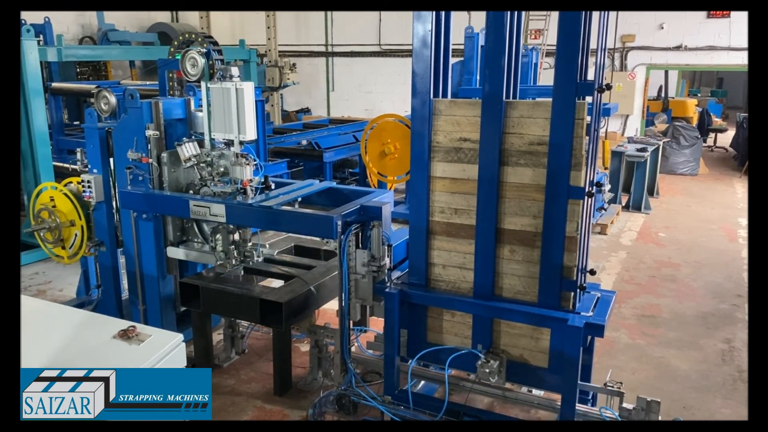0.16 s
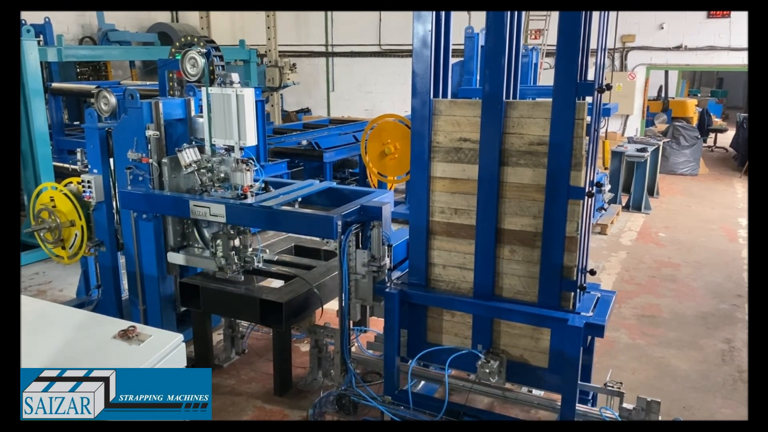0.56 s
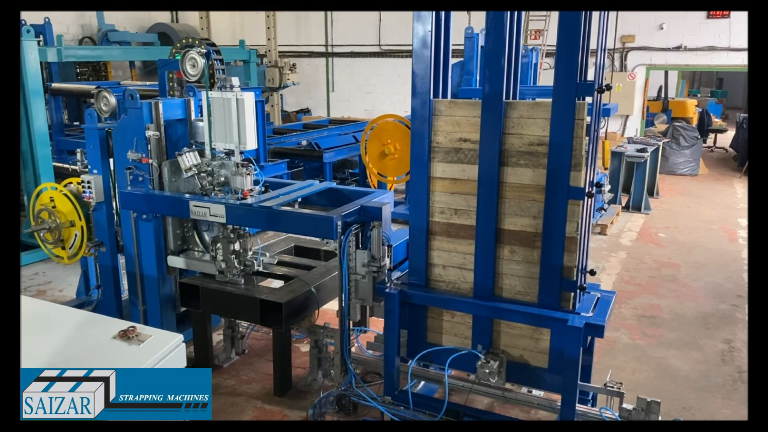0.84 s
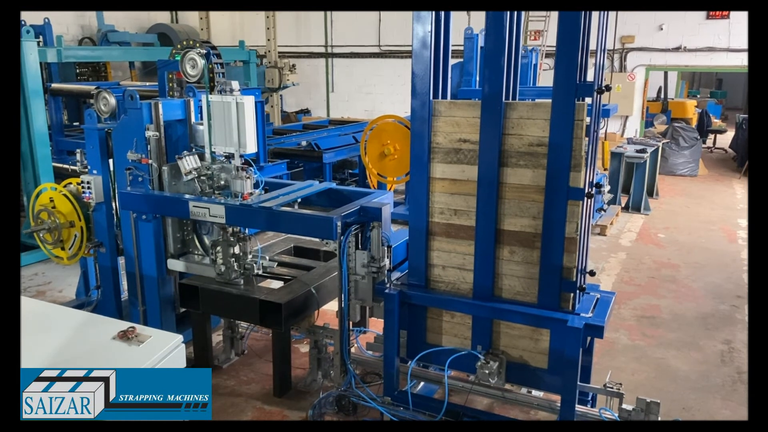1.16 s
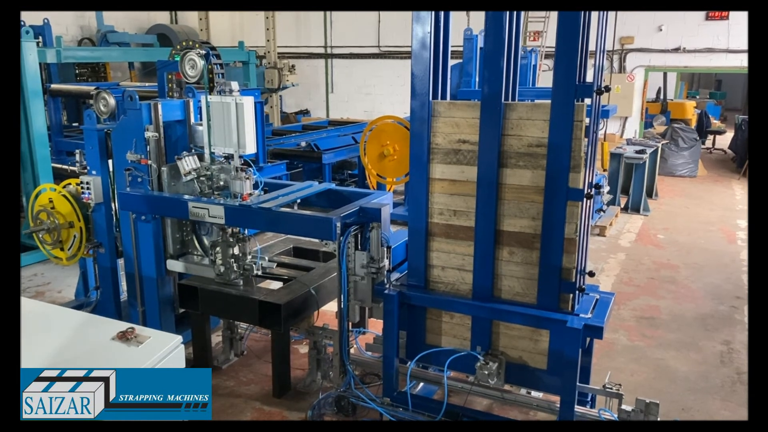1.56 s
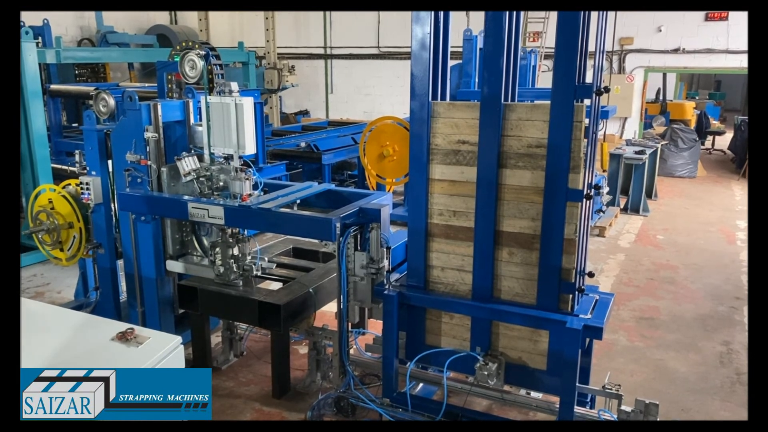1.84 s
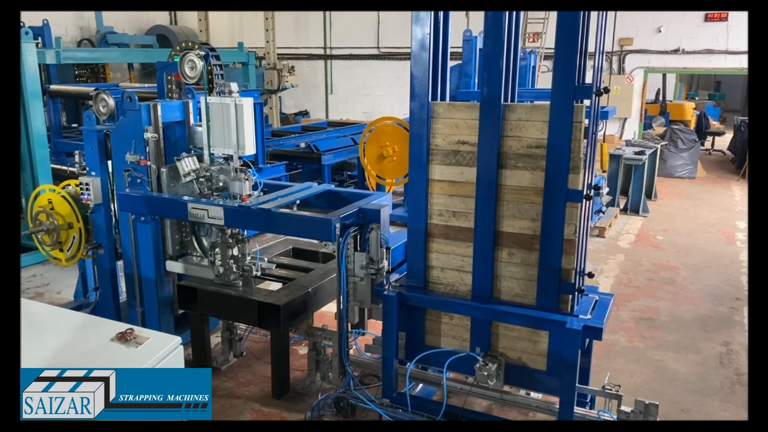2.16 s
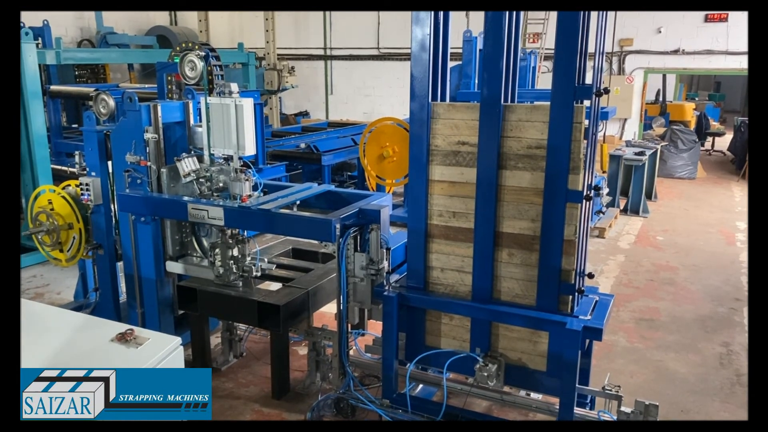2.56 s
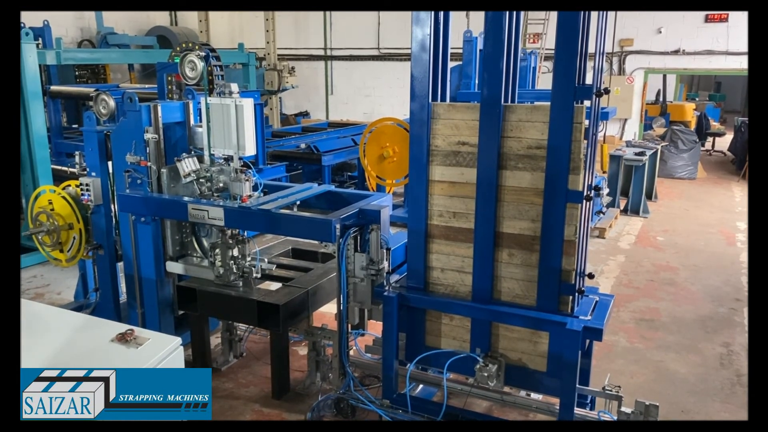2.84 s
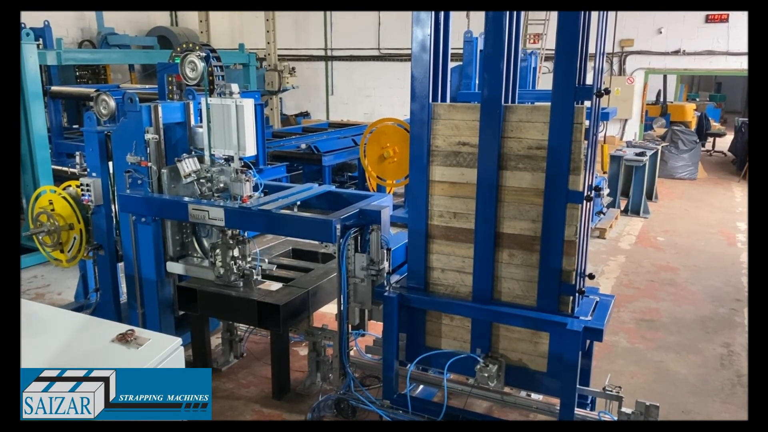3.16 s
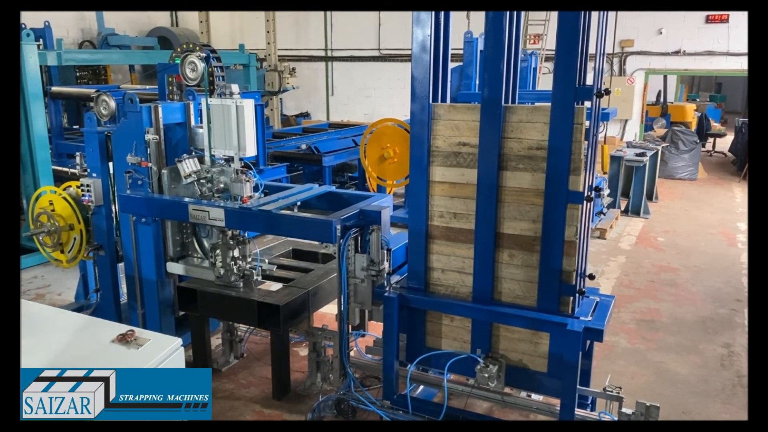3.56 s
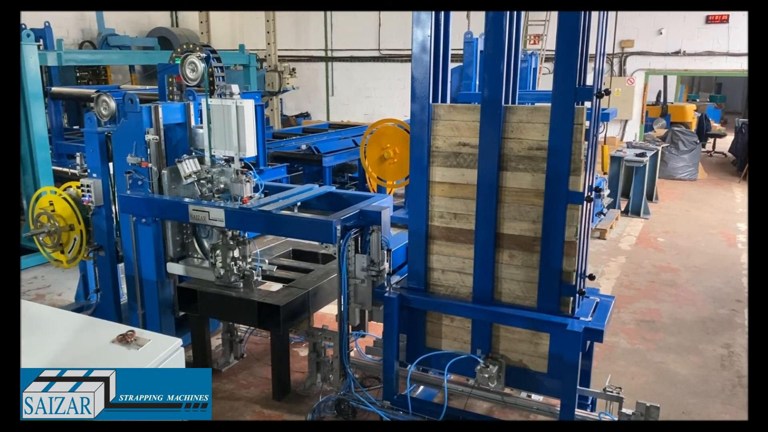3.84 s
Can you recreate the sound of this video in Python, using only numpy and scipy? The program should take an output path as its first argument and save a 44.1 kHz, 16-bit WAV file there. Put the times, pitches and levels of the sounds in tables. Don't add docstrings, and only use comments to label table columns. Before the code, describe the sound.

A strapping machine, slightly left and a few steps away in a hard-walled hall, hisses compressed air until 1.2 s, with clacks at 0.1 and 0.3. A low drive hums and rubs from 0.9 to 1.3; metallic knocks cluster at 1.1-1.6. Faint ventilation remains until clacks at 2.7, the strongest ringing, and 2.95. From 3.3 a harsh 250 Hz friction-weld buzz runs up, growing purer and louder around 3.7-3.8, then rougher to the end.

```python
import sys
import numpy as np
from scipy import signal
from scipy.fft import rfft, irfft, next_fast_len
from scipy.io import wavfile
from scipy.ndimage import uniform_filter1d, map_coordinates

SR = 44100
rng = np.random.default_rng(int(sys.argv[2]) if len(sys.argv) > 2 else 0)


def linear_from_db(decibels):
    return 10 ** (np.asarray(decibels, float) / 20)


def unload_audio(sound):
    columns = np.transpose(np.atleast_2d(sound))
    steps = np.round(np.clip(columns, -1, 1) * 32767)
    wavfile.write(sys.argv[1], SR, steps.astype(np.int16))


N = 176400
T = np.arange(N) / SR


def unit(x):
    return x / np.sqrt(np.mean(x ** 2) + 1e-20)


def along(points, hz):
    point_hz, value = np.transpose(points)
    return np.interp(np.log(hz + 1), np.log(point_hz + 1), value)


def curves(rows):
    seconds, *columns = np.transpose(rows)
    return [np.interp(T, seconds, column) for column in columns]


def fall_db(start_s, t60_s):
    return -60 * np.clip(T - start_s, 0, 9) / t60_s


def wobble(rate):
    return map_coordinates(rng.standard_normal(99 * 8), [T * rate])


def filtered(x, response):
    size = next_fast_len(x.shape[-1] + 8192)
    spectrum = rfft(x, size) * response(np.fft.rfftfreq(size, 1 / SR))
    return irfft(spectrum, size)[..., :x.shape[-1]]


def leading(pair):
    lead_s, top_hz = 4.5e-5, 5500

    def response(f):
        return np.exp(1j * np.pi * lead_s * np.outer([1, -1], f / (1 + (f / top_hz) ** 4)))
    return filtered(pair, response)


# frequency in Hz, correlation.
LIKENESS = [(100, .98), (400, 0.4), (1200, 0), (4000, .2), (7500, 0.45), (10500, .25), (13000, 0.8)]


def rush(spectrum):
    patchy_db = .8
    z = signal.stft(rng.standard_normal((2, N)), nperseg=512)[2]
    field = uniform_filter1d(rng.standard_normal(z.shape[1:]), size=6, axis=0)
    field = uniform_filter1d(field, size=10, axis=1)
    noise = signal.istft(z * linear_from_db(patchy_db * unit(field)), nperseg=512)[1][:, :N]

    def response(hz):
        turn = np.arccos(np.clip(along(LIKENESS, hz), -1, 1)) / 2
        return linear_from_db(along(spectrum, hz)) * [np.cos(turn), np.sin(turn)]
    mid, side = filtered(noise, response)
    return unit(leading(np.array([mid + side, mid - side])))


# frequency in Hz, level in dB.
WALLS = [(300, -1), (5000, -0.5), (9000, -4), (16000, -2.5)]
# frequency in Hz, 60 dB decay in seconds.
HALL_T60 = [(300, 0.76), (3000, 0.94), (9000, 1), (16000, 0.39)]


def placed(x, pan_db, wet_db):
    hz, t, z = signal.stft(rng.standard_normal((2, SR)), SR, nperseg=256)
    tail_db = along(WALLS, hz)[:, None] - 60 * t / along(HALL_T60, hz)[:, None]
    tail = signal.istft(z * linear_from_db(tail_db), SR, nperseg=256)[1]
    tail /= np.linalg.norm(tail[0])
    late = np.pad(x, (300, 0))[None]
    wet = signal.fftconvolve(late, tail, axes=1)[:, :len(x)]
    pan = linear_from_db(np.array([[pan_db], [-pan_db]]) / 2)
    return leading(np.array([x, x])) * pan + linear_from_db(wet_db) * wet


# time in seconds, flow in dB.
AIR_FLOW = [
    (0, -28),
    (.05, -31),
    (1.16, -30),
]
# frequency in Hz, density in dB per Hz.
JET = [(250, -27), (500, -21), (1000, -9.5), (3900, -2), (6500, -3.5), (10500, -12.5), (14000, -9),
       (16000, -12.5)]


def valve():
    shut_s, t60_s = 1.185, 0.6
    flow_db, = curves(AIR_FLOW)
    gain = linear_from_db(flow_db + wobble(12.66) / 2 + fall_db(shut_s, t60_s))
    return gain * rush(JET) * linear_from_db([[.5], [-.5]])


# start in seconds, level in dB, rise in seconds,
# 60 dB decay of the rattle in seconds, noise over ring in dB.
HITS = [(0, -43, .003, 0.62, -6), (.131, -28, 0.0049, 0.24, 6.5), (.263, -25.5, 0.0064, 0.17, 2.5),
        (.855, -43, 0.012, 0.21, 5), (1.137, -23.5, 0.024, 0.28, 0.5), (1.201, -21, 0.0085, 0.31, -6),
        (1.222, -22.5, 0.0067, 0.14, -2.5), (1.243, -35, 0.006, 0.15, 4.5),
        (1.321, -21, 0.0036, 0.027, -11.5), (1.558, -37.5, 0.015, 0.12, 3),
        (1.576, -27.5, 0.0037, 0.19, -5), (2.195, -63, 0.0038, .06, 3), (2.283, -65, 0.0033, .03, 1),
        (2.416, -66, 0.011, 0.23, 7), (2.618, -59, .003, .04, 2), (2.665, -34, 0.0061, 0.34, -1),
        (2.716, -27, .008, 0.13, 2), (2.726, -15.5, 0.0087, 0.13, -7), (2.957, -29, 0.0017, 0.31, -1),
        (2.958, -43, 0.004, 0.23, 4.5)]
PANS_DB = [2, -0.5, 0.5, 2, 1.5, 2, 0.5, -8, 5, 1, 3, 8, 0, 7, 7, 4, 8, 3, 2, 12]
# resonance in Hz, width in Hz, level in dB.
EARLIER = [(380, 40, 0), (1110, 50, 0), (1620, 90, -2)]
GRIP_A = [(312, 9, -6), (4490, 60, -1), (9950, 50, 1), (12900, 60, -3), (14100, 90, -6)]
GRIP_B = [(1190, 110, 2), (4490, 60, -6), (10600, 50, 2), (14000, 60, -3), (14900, 60, -10)]
STOP = [(415, 84, 3.5), (764, 3.7, 6), (970, 20, -58), (1230, 23, -8)]
PAWL = [(7580, 150, 5), (12900, 120, -6), (14700, 200, -6)]
CAM_A = [(2480, 60, -12), (4490, 35, -1), (4930, 55, -2), (7070, 50, -3), (7190, 40, 2), (9720, 90, 1),
         (10570, 70, 0), (13900, 110, -5), (15150, 170, -4)]
CAM_B = [(760, 40, -9), (1300, 250, -2), (4490, 45, -2), (7170, 50, -1), (9760, 110, -4), (10570, 45, -4),
         (15280, 90, -6)]
LATCH = [(900, 470, 2.5), (4520, 40, -12), (8120, 136, 1), (14100, 140, -3)]
CAM_C = [(426, 14, -9), (750, 15.5, -1), (1340, 75, -6.5), (4495, 76, 4), (7190, 18, 0.5), (9570, 29, -4.5),
         (10500, 49, -16), (13900, 51, -7), (15120, 46, -5)]
PRESS = [(760, 160, -1), (1750, 80, 0), (2450, 70, -2), (3760, 30, -3), (4480, 25, -3), (5160, 45, -4),
         (6250, 60, -8)]
# frequency in Hz, level in dB.
CLACK = [(100, -45), (300, -4), (700, -8), (3000, -1), (8000, 1), (15000, -5)]
# frequency in Hz, level in dB.
THUD = [(150, -26), (300, -17), (400, -3), (620, -1), (950, -5), (1500, -20), (4000, -38)]
# frequency in Hz, level in dB.
PADDED = [(100, -21), (400, -1), (2000, -3), (6000, -3.5), (15000, -14)]


def clacks():
    damped_hz = 9200
    widen, wet_db = 1.5, -3
    out, t = np.zeros((2, N + 2 * SR)), np.arange(SR) / SR
    parts = [EARLIER, GRIP_A, GRIP_B, STOP, STOP, CAM_A, CAM_A, STOP, PAWL, LATCH, CAM_B,
             LATCH, LATCH, LATCH, PAWL, LATCH, LATCH, CAM_C, PRESS, STOP]
    for (start, db, rise, t60, noise_db), pan_db, part in zip(HITS, PANS_DB, parts):
        shape = np.minimum(t / rise, 1) ** 2 * linear_from_db(-60 * np.maximum(t - rise, 0) / t60)
        rattle = shape * rng.standard_normal((len(part) + 1, len(t)))
        hz, width, level = np.transpose(part)[:, :, None]

        def resonance(f):
            return 1j * f * width / (hz * hz - f * f + 1j * f * width * widen)
        rings = filtered(rattle[1:] * shape ** (hz / damped_hz), resonance)
        ring = np.sum(linear_from_db(level) * rings / np.linalg.norm(rings, axis=1)[:, None], 0)

        colour = CLACK
        if part is STOP or part is EARLIER:
            colour = THUD
        elif part is PRESS:
            colour = PADDED
        crack = filtered(rattle[0], lambda f: linear_from_db(along(colour, f)))
        both = ring / np.linalg.norm(ring) + linear_from_db(noise_db) * crack / np.linalg.norm(crack)
        hit = linear_from_db(db) * np.linalg.norm(shape) * placed(both, pan_db, wet_db)
        out[:, round(start * SR):][:, :len(t)] += hit
    return out[:, :N]


def tones(lines):
    sway_db, spread = 2, .3
    out = 0
    for hz, db in lines:
        phase = 2 * np.pi * hz * T + rng.normal(0, spread, (2, 1))
        out = out + linear_from_db(db + sway_db * wobble(15.0)) * np.sqrt(2) * np.sin(phase)
    return out


# frequency in Hz, density in dB per Hz.
VENTILATION = [(15, -58), (25, -11), (97, -4.5), (734, -11), (1230, -7), (6740, -30), (10200, -39),
               (11000, -61), (12300, -40), (15000, -38), (15600, -65)]
# frequency in Hz, rms level in dB.
HUM = [(107.7, -61), (727, -73), (1071, -65), (1249, -63.5), (9851, -63.5), (9981, -71), (10148, -77)]


def hall():
    return linear_from_db(-47) * rush(VENTILATION) + tones(HUM)


SLIDE_S = (.87, .92, 1.13, 1.273)
# frequency in Hz, rms level in dB.
DRIVE = [(145.3, -48.5), (430.7, -47.5), (600, -53)]


def slide():
    moves, sings, ends, stops = SLIDE_S
    moving = np.clip((T - moves) / 0.009, 0, 1) * linear_from_db(fall_db(stops, 0.54))
    singing = np.clip((T - sings) / 0.068, 0, 1) * linear_from_db(fall_db(ends, 0.4))
    lowest = moving * np.clip((T - sings) / 0.032, 0, 1) * tones(DRIVE[:1])
    drive = linear_from_db(1) * (singing * tones(DRIVE[1:]) + lowest)
    return drive + moving * linear_from_db(-44.5) * rush(THUD)


# time in seconds, stroke rate in Hz.
STROKES = [
    (3.3, 242),
    (3.36, 253.1),
    (3.42, 253.8),
    (3.55, 252),
    (3.66, 250.8),
    (4, 250.9),
]
# time in seconds, tone in dB, melt (0 dry, 1 soft, 2 molten), third order in dB.
WELD = [(3.28, -32.5, 0.59, -61), (3.33, -25.5, 0.74, -45), (3.375, -23.5, 0.25, -38),
        (3.41, -22.5, 0.13, -28.5), (3.49, -22.5, 0.21, -21.5), (3.58, -19, 1.1, -27),
        (3.67, -17.5, 1.76, -18.5), (3.8, -17, 2.11, -18), (4, -24.5, 0.69, -21.5)]
# time in seconds, friction in dB.
RUB = [(3.255, -50), (3.28, -32.5), (3.295, -21.5), (3.4, -21.5), (3.55, -23), (3.75, -24), (4, -25.5)]
DRY = [-10, -7.5, 0, -17, -9.5, -11.5, -5.5, -10, -24, -11.5, -15.5, -16, -12, -20, -18, -14, -10, -21, -28,
       -23, -35, -27, -18, -28, -19.5, -25, -25, -19, -17, -16, -24, -23, -12, -15, -11, -18, -14, -18, -24,
       -16]
SOFT = [-12, -15.5, 0, -10.5, -9, -12.5, -18.5, -20, -24, -20, -22, -11.5, -22, -25, -19, -21, -19, -19,
        -18, -16, -31, -23, -26, -17, -19.5, -24, -30, -28, -25, -19, -29, -22, -28, -18, -15, -19, -22,
        -22, -34, -25]
MOLTEN = [-17, -29.5, 0, -29, -22, -23.5, -18.5, -29, -26, -26.5, -16, -16, -23.5, -33, -40, -36, -22.5,
          -33, -29, -38, -31, -25.5, -23, -37, -27, -34, -35, -26, -27, -35, -19, -31, -23, -22.5, -21,
          -17.5, -28, -32, -42, -26.5]
# frequency in Hz, density in dB per Hz.
FRICTION = [(59, -79), (100, -42), (244, -23), (302, -24), (676, -12.5), (752, -10), (930, -11),
            (8830, -21), (16000, -25.5)]
# frequency in Hz, level in dB.
FRAME = [(40, -45), (100, -3), (180, 8), (3000, -25.5)]


def welder():
    wander_db, flutter_db, jitter = 2, 3, .045
    squeal_s, squeal_wide_s, squeal_hz, squeal_db = 3.865, .035, 5620, 8
    wet_db, body_wet_db = -5, -12.5
    a = int(3.2 * SR)
    t = T[a:]
    weld_s, rub_s = WELD[0][0], RUB[0][0]
    (hz,), (tone_db, melt, third_db), (rub_db,) = curves(STROKES), curves(WELD), curves(RUB)
    phase = 2 * np.pi * np.cumsum(hz[a:]) / SR

    def sine(k):
        unsteady = jitter * k * wobble(40)[a:] + rng.uniform(0, 2 * np.pi)
        return (t > weld_s) * np.sqrt(2) * np.sin(k * phase + unsteady)

    orders = 0
    for k, *states in zip(range(1, 41), DRY, SOFT, MOLTEN):
        if k in (1, 3):
            continue
        unrest_db = (wander_db * np.tanh(wobble(14)) + flutter_db * wobble(60))[a:]
        db = np.interp(melt[a:], range(3), states) + min(k / 8, 1) ** 2 * unrest_db
        near = ((t - squeal_s) / squeal_wide_s) ** 2 + ((k * hz[-1] - squeal_hz) / 300) ** 2
        db = db + squeal_db * np.exp(-near)
        orders = orders + linear_from_db(db + tone_db[a:]) * sine(k)

    first = linear_from_db(-34 - 190 * np.clip(3.39 - t, 0, 9)) * sine(0.99)
    third = linear_from_db(third_db[a:]) * sine(3)
    tone = placed(orders, 1.0, wet_db) + placed(first, -6, body_wet_db) + placed(third, 1.6, body_wet_db)

    friction = linear_from_db(rub_db) * (T > rub_s) * rush(FRICTION)
    rub = friction[:, a:] * (1 + 0.16 * np.sin(phase))
    shudder = linear_from_db(-31.5 - 60 * (T - weld_s) + rub_db - rub_db.max()) * rush(FRAME)
    return np.pad(tone + rub + shudder[:, a:], ((0, 0), (a, 0)))


def scene():
    return valve() + clacks() + hall() + slide() + welder()


def low_pass(x):
    return signal.sosfilt(signal.butter(12, 16230, fs=SR, output="sos"), x)


def record(dry):
    bass_cut_hz, top_hz = 55, 15800

    def microphone(f):
        bass = (1j * f / (bass_cut_hz + 1j * f)) ** 2
        return bass * np.clip((top_hz - f) / 400 + .5, 0, 1)
    mix = filtered(dry, microphone)
    return low_pass(mix)


dry = scene()
out = record(dry)
unload_audio(out)
```